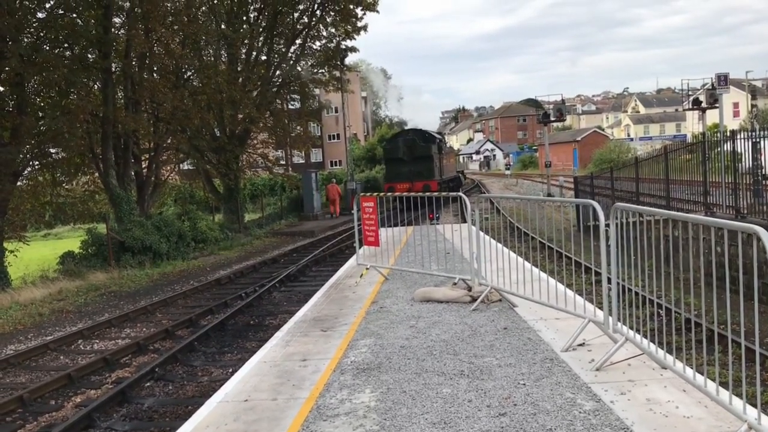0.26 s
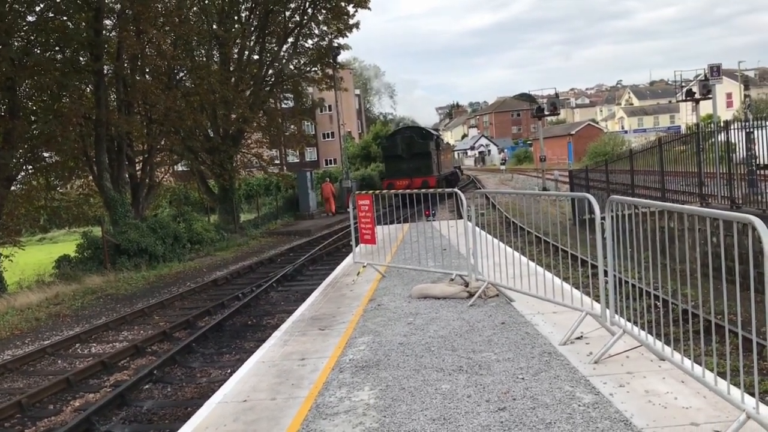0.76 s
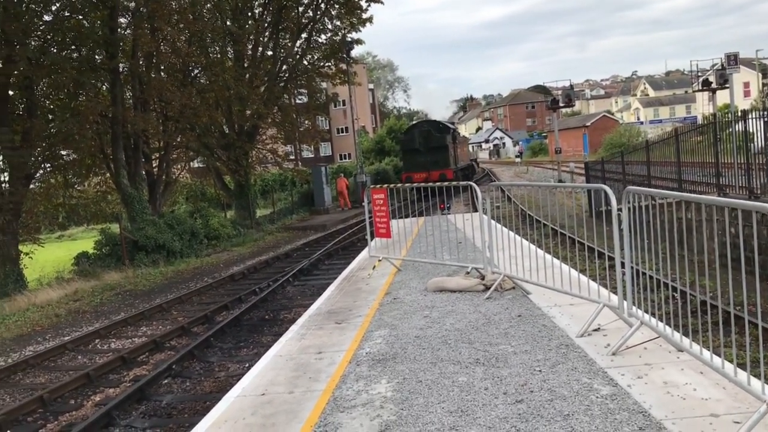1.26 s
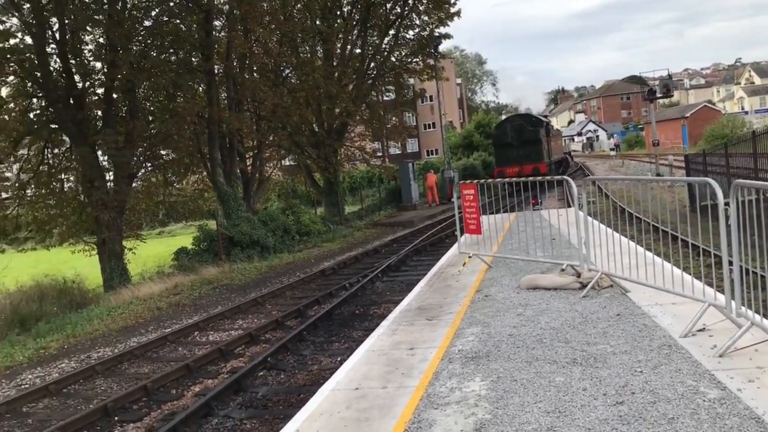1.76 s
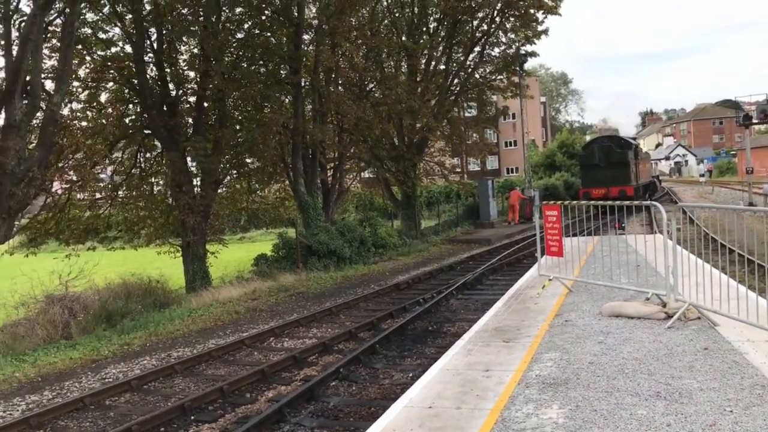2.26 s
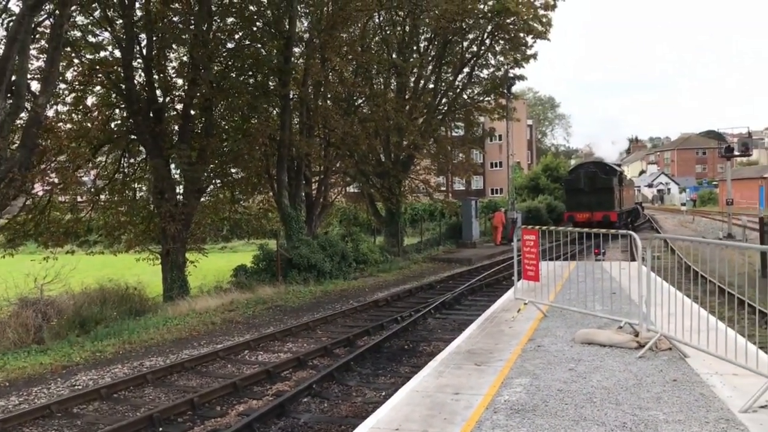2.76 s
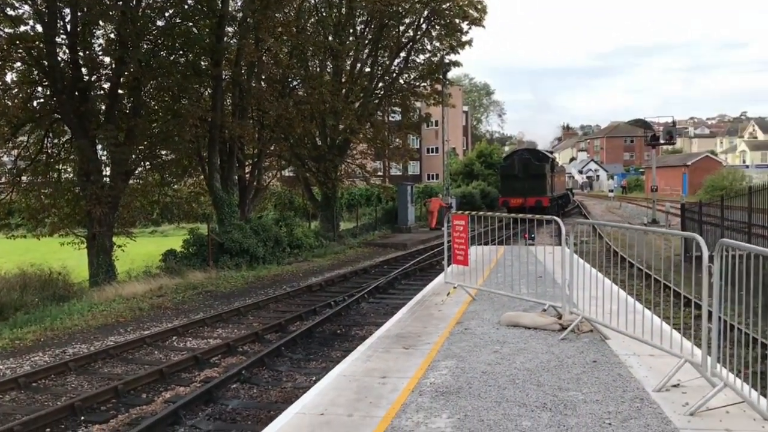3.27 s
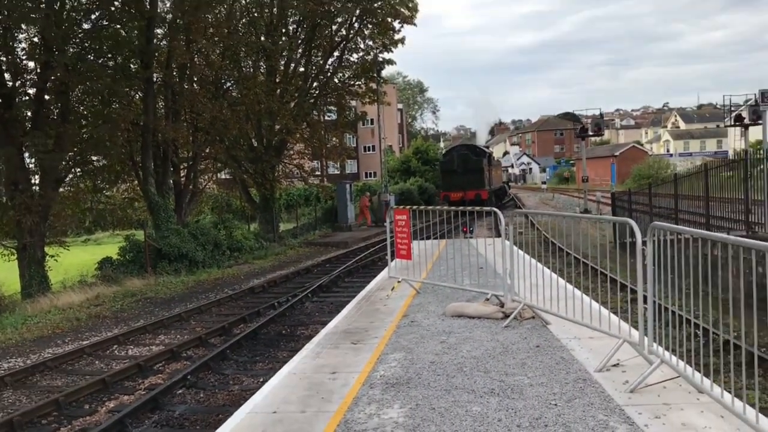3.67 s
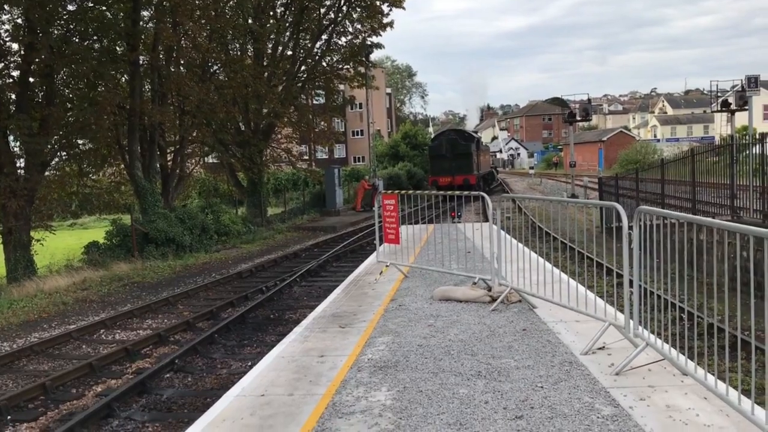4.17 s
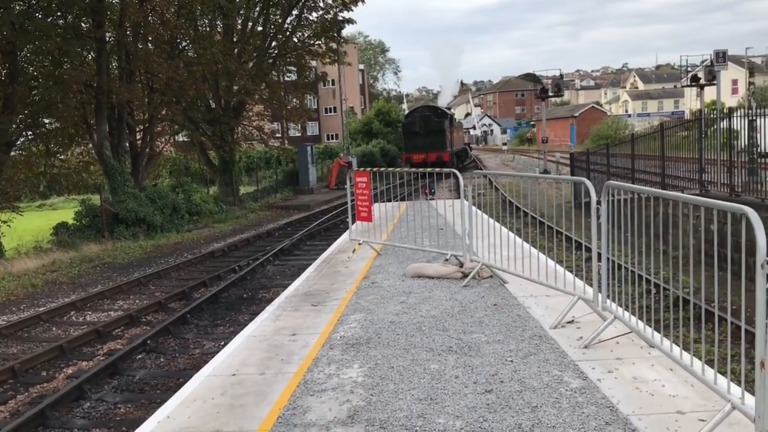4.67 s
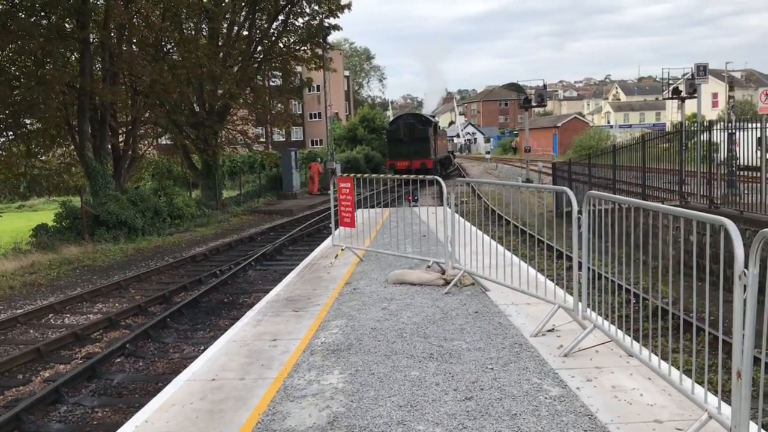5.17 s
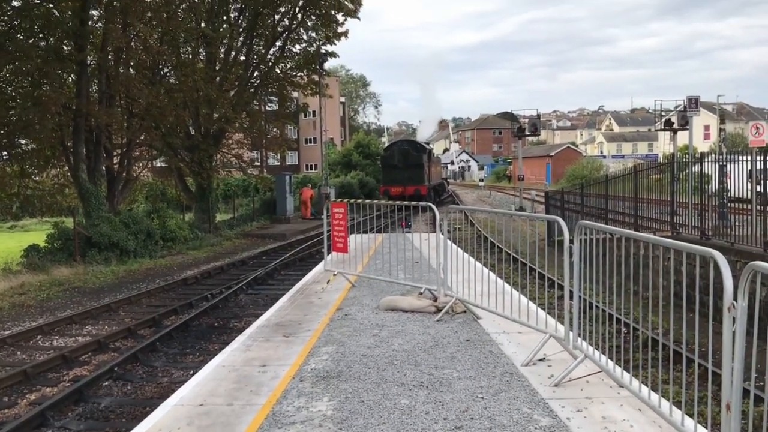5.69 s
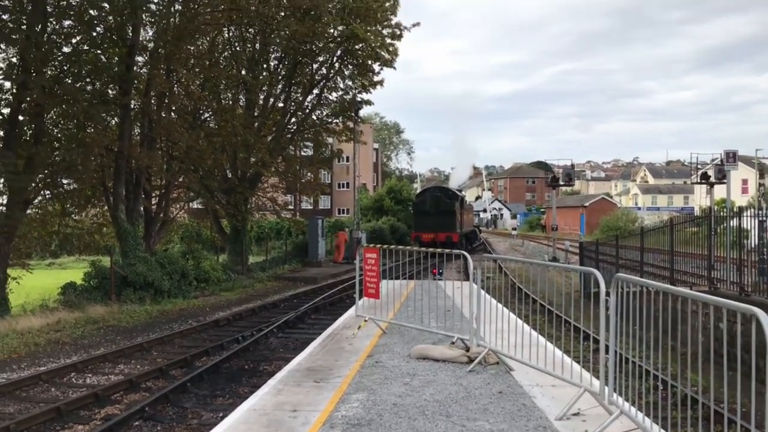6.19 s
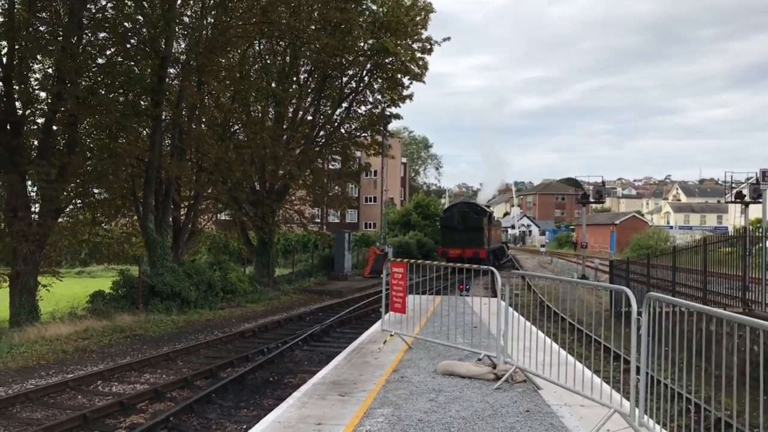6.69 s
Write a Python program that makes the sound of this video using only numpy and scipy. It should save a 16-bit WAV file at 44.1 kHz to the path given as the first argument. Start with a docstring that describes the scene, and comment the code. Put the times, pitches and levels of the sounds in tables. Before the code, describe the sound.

Heard from one microphone on a railway platform, a distant steam locomotive blows off with a continuous, even hiss. Underneath are gusty wind, faint traffic rumble and a low hum that swells and wavers. Something ticks and metal clanks nearby. After a split-second gap about halfway, the hum is gone and the steam and wind are much louder. A second short clank follows, and gusts keep thumping the microphone.

```python
"""A station platform, one microphone, a steam locomotive standing at the far end.
It blows off steam in a steady hiss: jet noise coloured by the vent pipe and by nearby surfaces.
Far traffic, a wavering hum and wind fill the bass; gusts thump the microphone, and a few ticks
and metal clanks fall close by. Midway the sound drops out for an instant; the hum ends there,
and hiss and wind return louder."""
import sys
import numpy as np
from scipy import signal
from scipy.fft import rfft, irfft
from scipy.io import wavfile
from scipy.ndimage import uniform_filter1d

SR = 44100
rng = np.random.default_rng(int(sys.argv[2]) if len(sys.argv) > 2 else 0)


def dump_mix(stems):
    """Bounce the given channels to the path in sys.argv[1] as a 16-bit WAV at rate SR."""
    frames = np.atleast_2d(stems).T  # one column per channel
    limited = np.clip(frames, -1, 1)  # hard clip at full scale
    pcm = np.round(limited * 32767).astype(np.int16)
    wavfile.write(sys.argv[1], SR, pcm)


N = 306033
DROP_S, LIFT_DB = 3.6572, 9.5  # the drop-out, and how much louder hiss and wind return


def lift(t):
    """Level step in dB at the drop-out."""
    return LIFT_DB * (t >= DROP_S)


def gain_of(db):
    """Decibels to a factor."""
    return 10 ** (np.asarray(db) / 20)


def unit_rms(x):
    """Scales to rms 1."""
    return x / np.sqrt(np.mean(x ** 2) + 1e-20)


def spectrum_at(points, hz):
    """Interpolates a spectrum on a log-frequency axis."""
    f, value = np.transpose(points)
    return np.interp(np.log(hz + 1), np.log(f + 1), value)


def follow(rows, t):
    """The columns of a curve table at times t."""
    times, *columns = np.transpose(rows)
    return [np.interp(t, times, column) for column in columns]


def add(mix, start_s, sound):
    """Mixes a sound in at start_s."""
    part = mix[round(start_s * SR):][:len(sound)]
    part += sound[:len(part)]


def bump(x, centre, width):
    """Bell curve of height 1 over frequency or time."""
    return np.exp(-.5 * ((x - centre) / (width / 2)) ** 2)


def frame_grid(size):
    """Bin frequencies (column) and frame times of a short-time spectrum."""
    return np.fft.rfftfreq(size, 1 / SR)[:, None], np.arange(4 * N // size + 5) * size / 4 / SR


def noise(field_db, size):
    """Noise whose short-time spectrum follows a dB field, bins x frames."""
    real, imag = rng.standard_normal(field_db.shape[::-1] + (2,)).T
    spectrum = (real + 1j * imag) * gain_of(field_db)
    return signal.istft(spectrum, nperseg=size, noverlap=3 * size // 4)[1][:N]


def drift(shape, bins, frames):
    """Random patches of rms 1, so many bins wide and frames long."""
    white = rng.standard_normal(shape[::-1]).T
    return unit_rms(uniform_filter1d(uniform_filter1d(white, bins, axis=0), frames, axis=1))


def band_db(spectrum_db, hz, low_hz, high_hz):
    """Level of one band of a noise spectrum."""
    inside = (hz[:, 0] > low_hz) & (hz[:, 0] < high_hz)
    return 10 * np.log10((gain_of(spectrum_db[inside]) ** 2).sum() * 2 / 3)


# Traffic rumble, far off: f/Hz, relative level/dB
TRAFFIC_SPECTRUM = [(18, -30), (30, 3), (53, 4), (73, -4), (162, -19.5), (231, -19), (359, -21.5),
                    (450, -24), (580, -54), (990, -120)]


def traffic(level_db=-56.5):
    """Far traffic reaches the platform as smooth low noise."""
    hz, t = frame_grid(size=2048)
    steady_db = np.tile(spectrum_at(TRAFFIC_SPECTRUM, hz), len(t))
    return gain_of(level_db) * unit_rms(noise(steady_db, size=2048))


# Swells of the background hum: t/s, length/s, level/dB, f/Hz, rise/share of length
HUM_SWELLS = [(.24, 1, -53, 65.2, .3), (1.578, 0.16, -54, 61.5, .3), (1.8, 0.52, -48.5, 63.3, 0.58),
              (2.24, 0.23, -45.5, 62.7, 0.17), (2.495, 0.71, -45.5, 61.3, 0.38),
              (3.22, 0.47, -44, 61.2, 0.18)]


def hum(fall_share=.4, drone_hz=102, drone_db=-65):
    """A low tone swells and wavers, each time on its own pitch, over a faint drone until the drop-out."""
    t = np.arange(round(DROP_S * SR)) / SR
    swells = np.zeros(len(t))
    for start, length, db, hz, rise_share in HUM_SWELLS:
        ramps = np.minimum((t - start) / rise_share, (start + length - t) / fall_share)
        swells += gain_of(db) * np.clip(ramps / length, 0, 1) * np.sin(2 * np.pi * hz * t)
    slow_noise = uniform_filter1d(uniform_filter1d(rng.standard_normal(len(t)), 2500), 2500)
    waver = 1 + .12 * unit_rms(slow_noise)
    drone = gain_of(drone_db) * np.sin(2 * np.pi * drone_hz * t)
    return np.sqrt(2) * (swells * waver + drone)


# Wind at the microphone: t/s, strength/dB
WIND_STRENGTH = [(0, 4), (.35, -4.5), (1.2, 1), (1.7, -4.5), (2.2, -0.5), (3.65, 0.5), (3.9, -0.5),
                 (4.55, -1.5), (5.2, 3.5), (5.6, 4), (5.8, -2), (6.15, 5), (6.5, 4.5), (6.65, -4),
                 (6.94, 4)]
# Its colour: f/Hz, relative level/dB
WIND_SPECTRUM = [(20, -40), (30, -16), (42, 7), (60, 5), (90, -2.5), (130, -7.5), (200, -12), (300, -15),
                 (400, -18.5), (550, -33), (800, -38)]
# Its boom, rumble and upper band: level/dB before the lift, response/dB per dB of strength
WIND_BANDS = [(-59.5, 1.3), (-60.5, 1.04), (-65, .2)]
# Brief low swells: wind rushes, and at 4.52 s the dull body of the metal clank: t/s, boost/dB
LOW_SWELLS = [(2.5, 10), (3.0, 3), (3.22, 8), (4.52, 13), (5.9, 3)]


def wind(swell_s=.09):
    """Lumpy low noise: three bands follow the wind by different amounts and flutter at random."""
    hz, t = frame_grid(size=2048)
    strength_db, = follow(WIND_STRENGTH, t)
    colour_db = spectrum_at(WIND_SPECTRUM, hz)
    boom_db, rumble_db, upper_db = (db + response * strength_db + lift(t) for db, response in WIND_BANDS)
    upper_db += sum(db * bump(t, at_s, swell_s) for at_s, db in LOW_SWELLS)
    boom_db -= band_db(colour_db, hz, 33, 52)
    rumble_db -= band_db(colour_db, hz, 72, 130)
    upper_db -= band_db(colour_db, hz, 140, 420)
    deep, high = np.clip((85 - hz) / 40, 0, 1), np.clip((hz - 110) / 60, 0, 1)  # band crossfades
    level_db = deep * boom_db + (1 - deep - high) * rumble_db + high * upper_db
    flutter_db = 1.5 * drift((len(hz), len(t)), bins=4, frames=7)
    return noise(colour_db + level_db + flutter_db, size=2048)


# Wind buffets on the microphone: t/s, level/dB, f/Hz
MIC_THUMPS = [(.015, -39, 54), (.13, -41, 56.5), (2.451, -31.5, 73), (2.672, -45, 75), (2.745, -48, 61.5),
              (3.181, -38, 88.8), (3.26, -47, 62), (3.785, -38, 54), (4.755, -34, 62), (5.037, -39, 105),
              (5.413, -44, 61.9), (5.89, -27.5, 97.6), (6.19, -30, 51), (6.36, -44, 70.0), (6.48, -35, 51)]
# Ticks close by: t/s, level/dB, f/Hz
NEAR_TICKS = [(2.332, -40, 590), (2.3571, -23.5, 1310)]


def knock(db, hz, cycles):
    """A short push without a ring: a swing or two under a soft window."""
    turns = np.arange(round(2 * cycles * SR / hz)) * hz / SR - cycles
    window = np.exp(-(turns / (.29 * cycles)) ** 2)
    return gain_of(db) * window * np.cos(2 * np.pi * turns)


# Metal knocked near the microphone: t/s, level/dB, rise/s, scrape t60/s, relative ring level/dB
NEAR_CLANKS = [(2.479, -31, 0.0055, 0.36, -17), (2.503, -42, 0.0026, 0.13, -10),
               (2.541, -43, .003, 0.065, -10), (4.4837, -25, 0.0043, 0.047, -3),
               (4.4908, -26, 0.0028, 0.34, -13), (4.536, -40, 0.0027, 0.066, -3)]
# Modes of the metal: f/Hz, relative level/dB, t60/s
METAL_MODES = [(257, -22, 0.046), (344, -4.5, 0.097), (1520, -4, 0.032), (1785, 9, 0.017), (3570, 0, .03),
               (6410, -2, 0.058), (9550, -3, 0.038), (13800, -14, .04)]
# Colour of the scrape: f/Hz, relative level/dB
SCRAPE_SPECTRUM = [(300, -21), (800, -4.5), (1600, -3.5), (3500, -3.5), (5000, -8), (7000, -10),
                   (10000, -15), (15000, -27)]


def clank(db, rise_s, scrape_t60, ring_db):
    """A gritty scrape dies away while a cluster of tiny blows sets the metal ringing briefly."""
    t = np.arange(SR // 4) / SR
    grit = rng.standard_normal(len(t)) * gain_of(4.6 * np.minimum(rng.exponential(1, len(t)), 3))
    colour = gain_of(spectrum_at(SCRAPE_SPECTRUM, np.fft.rfftfreq(len(t), 1 / SR)))
    scrape = unit_rms(irfft(rfft(grit) * colour, len(t)))
    attack = np.minimum(t / rise_s, 1)
    decay = gain_of(-60 * np.maximum(t - rise_s, 0) / scrape_t60)
    blows = (rng.random(len(t)) < .04) * t * np.exp(-2 * t / rise_s)
    blows /= np.linalg.norm(blows) + 1e-12
    modes = sum(gain_of(mode_db - 60 * t / t60) * np.sin(2 * np.pi * hz * t)
                for hz, mode_db, t60 in METAL_MODES)
    ring = signal.fftconvolve(blows, modes)[:len(t)]
    return gain_of(db) * attack * (scrape * decay / 2 + gain_of(ring_db) * ring)


# The steam jet, heard from a platform's length away: f/Hz, relative level/dB
JET_SPECTRUM = [(200, -9), (500, -10), (800, -8.5), (1700, -4), (3500, -4.5), (4500, -6.5), (6500, -9.5),
                (9500, -11.5), (12000, -15.5), (14300, -17), (15000, -22.5), (16000, -22)]
# Resonances of the vent pipe: f/Hz, width/Hz, boost/dB
PIPE_TONES = [(959, 193, 8), (1465, 145, 4.5), (2090, 210, 1), (2900, 400, 2), (3240, 170, 1.5),
              (3690, 360, 1.5), (4170, 240, 2), (5320, 250, 0), (6070, 300, 0.8)]
# Dips where bounces off nearby surfaces cancel the direct sound: f/Hz, width/Hz, gain/dB
BOUNCE_DIPS = [(460, 127, -7), (815, 72, -2), (1170, 79, -1), (1324, 58, -2.5), (2627, 230, -3.5),
               (4930, 250, -2), (7680, 450, -2.5), (10460, 710, -4)]
# The blow-off: t/s, level/dB before the lift, extra treble/dB, factor on tones and dips below 1700 Hz
JET_COURSE = [(0, -49, 4, 1.07), (.6, -49.5, 2, 1.62), (1.3, -49, 2.5, 1.3), (2, -50, 0.5, 1.3),
              (2.5, -49.5, 2, 0.67), (3.1, -49.5, 1, 0.95), (3.6, -49.5, -2, .85), (4.2, -50, 1, 1.14),
              (4.8, -50.5, -0.5, 1.13), (5.4, -49.2, 1.5, 0.98), (5.88, -50, 1.2, 0.77),
              (5.94, -49.2, 3, .9), (6.2, -49.5, 1, .85), (6.5, -49.5, -1, 1), (6.94, -48.5, 1, 0.9)]


def steam():
    """Jet noise coloured by the pipe and by bounces; moving air on the long path shifts the colour."""
    hz, t = frame_grid(size=1024)
    shape = (len(hz), len(t))
    _, treble_db, low_depth = follow(JET_COURSE, t)
    jet_db = spectrum_at(JET_SPECTRUM, hz)
    contour_db = sum(db * bump(hz, centre, width) for centre, width, db in PIPE_TONES + BOUNCE_DIPS)
    colour_db = jet_db + contour_db * np.where(hz < 1700, low_depth, 1)
    brightness_db = np.clip((hz - 5000) / 7000, 0, 1) * treble_db
    air_db = .41 * drift(shape, bins=260, frames=9) + .56 * drift(shape, bins=14, frames=25)
    ripples_db = 2.1 * drift(shape, bins=1, frames=70)  # scattered echoes comb the hiss finely
    hiss = noise(colour_db + brightness_db + air_db + ripples_db, size=1024)
    sample_t = np.arange(N) / SR
    level_db = follow(JET_COURSE, sample_t)[0] + lift(sample_t)
    return gain_of(level_db - band_db(jet_db + contour_db, hz, 1200, 5000)) * hiss


def scene():
    """The platform from one microphone, the same in both channels."""
    mix = steam() + wind() + traffic()
    add(mix, 0, hum())
    for start, db, hz in MIC_THUMPS:
        add(mix, start, -knock(db, hz, cycles=.8))  # buffets pull the diaphragm outwards
    for start, db, hz in NEAR_TICKS:
        add(mix, start, knock(db, hz, cycles=1.4))
    for start, *blow in NEAR_CLANKS:
        add(mix, start, clank(*blow))
    return np.array([mix, mix])


def record(dry, low_cut_hz=38.8, high_cut_hz=15760, fall_s=.002, return_s=.022):
    """The microphone cuts the deepest bass; the level dips for an instant; the top treble is cut off."""
    heard = signal.sosfilt(signal.butter(8, low_cut_hz, "high", fs=SR, output="sos"), dry)
    since_drop = np.arange(N) / SR - DROP_S
    dip = np.clip(np.maximum(-since_drop / fall_s, since_drop / return_s), .08, 1)
    high_cut = signal.firwin(1535, high_cut_hz, window=("kaiser", 9), fs=SR)
    return signal.oaconvolve(heard * dip, high_cut[None], "same")


dry = scene()
out = record(dry)
dump_mix(out)
```